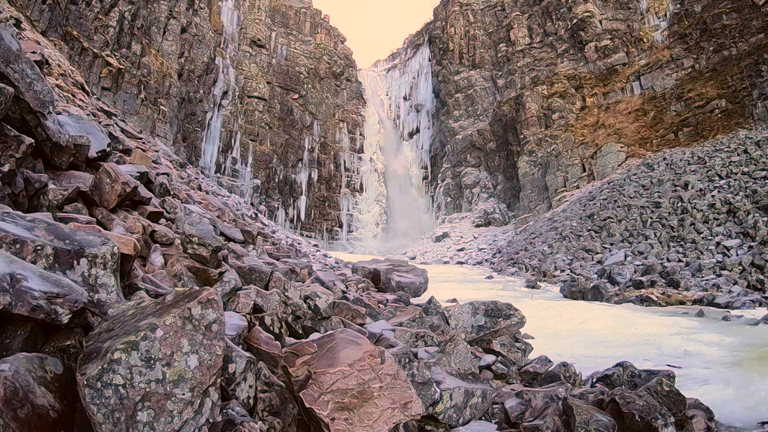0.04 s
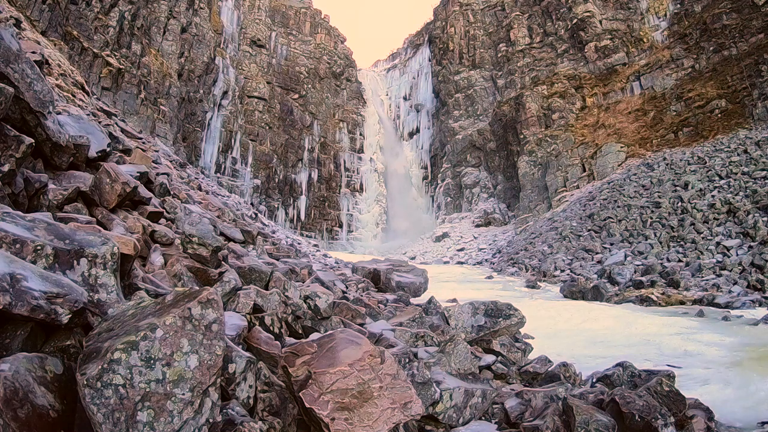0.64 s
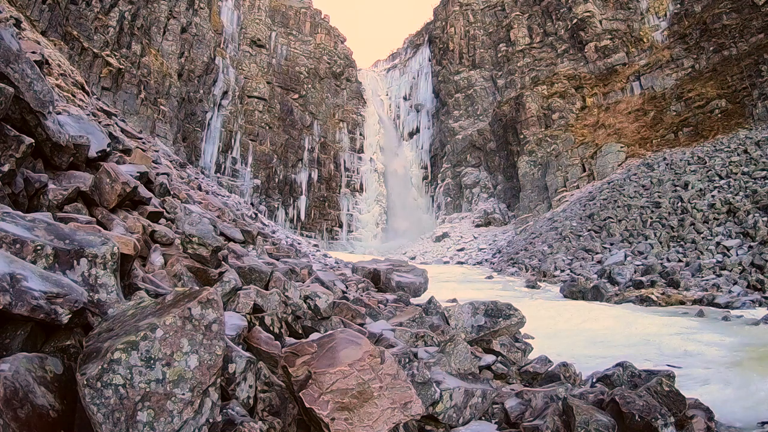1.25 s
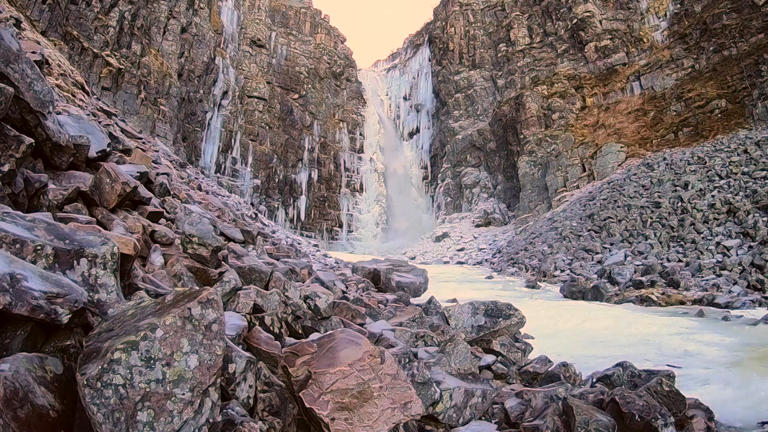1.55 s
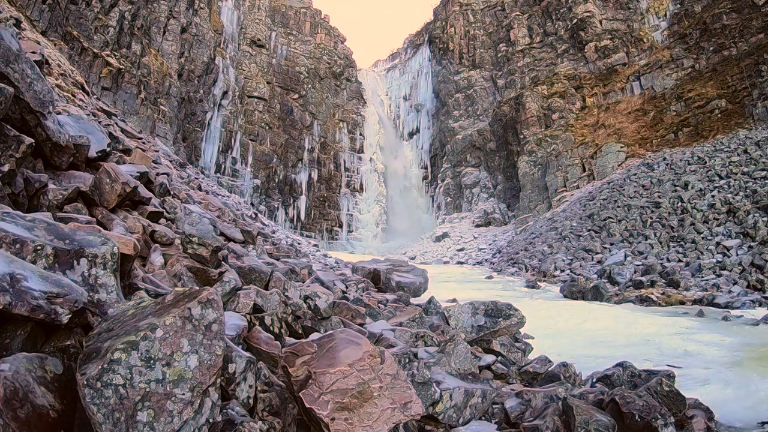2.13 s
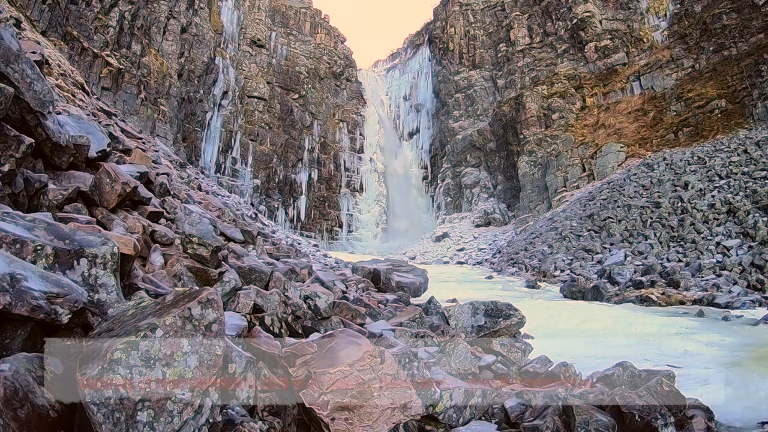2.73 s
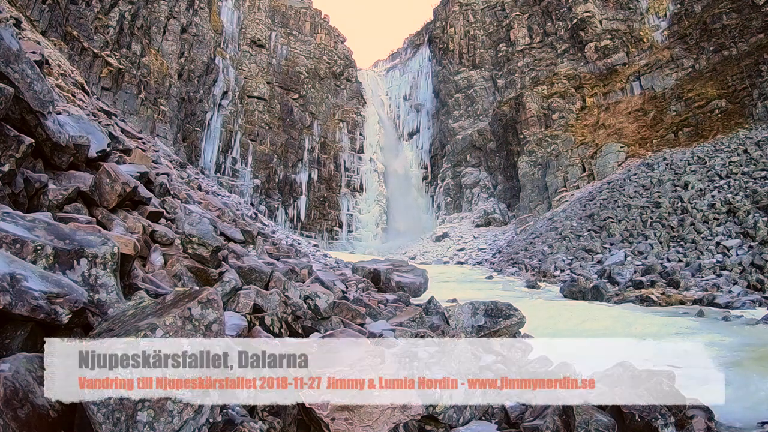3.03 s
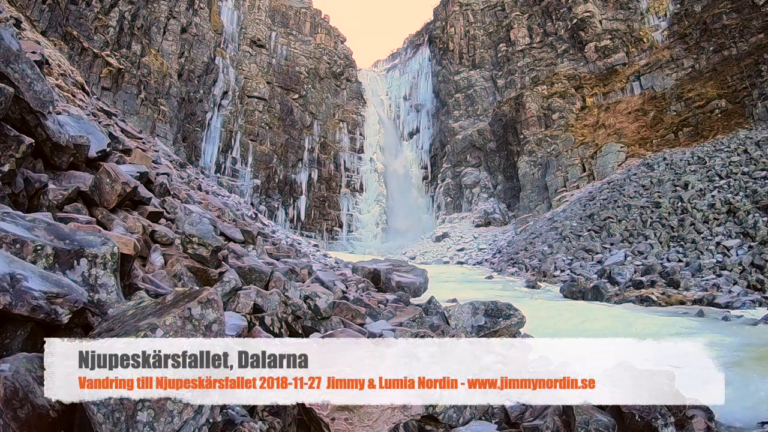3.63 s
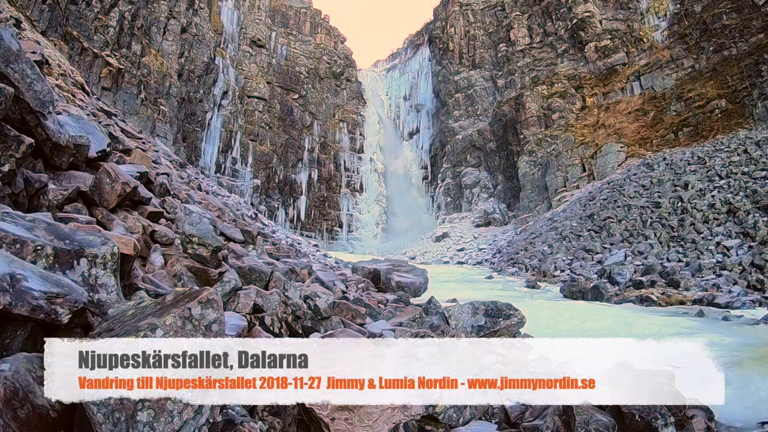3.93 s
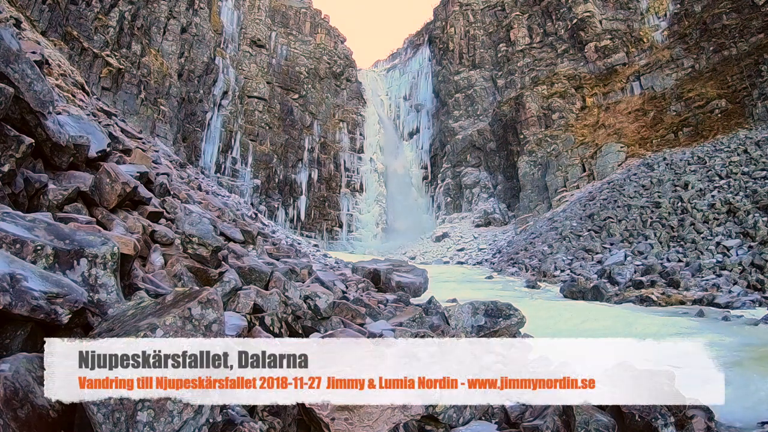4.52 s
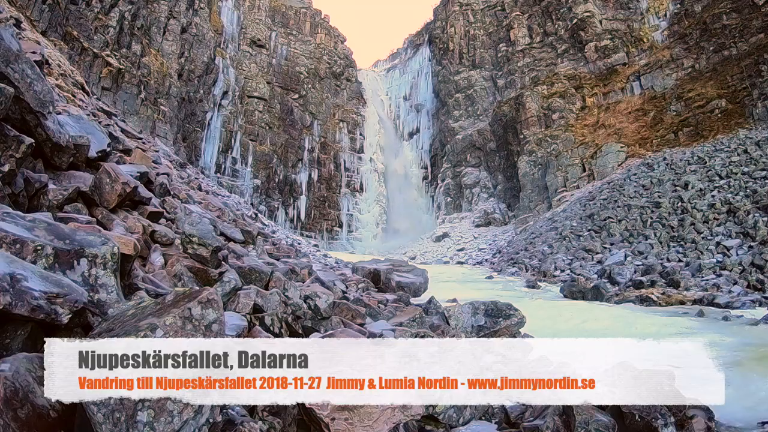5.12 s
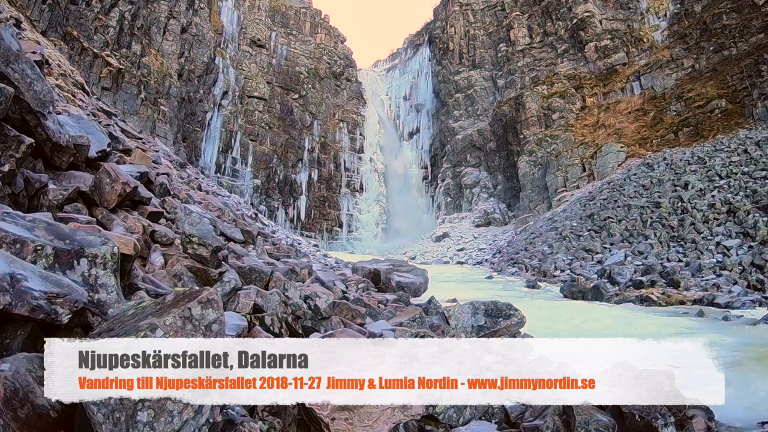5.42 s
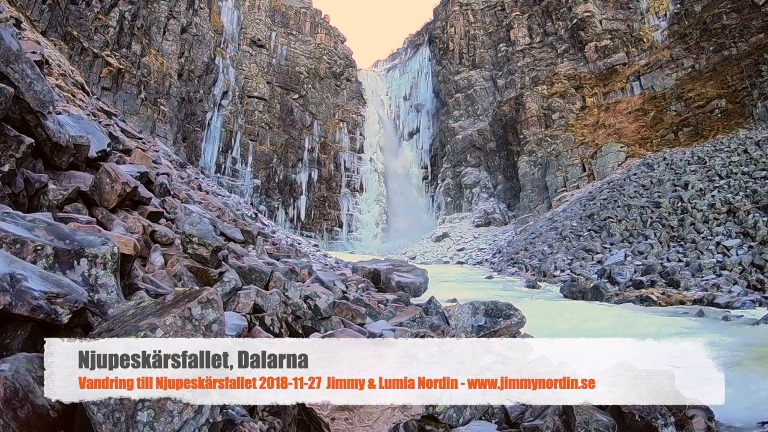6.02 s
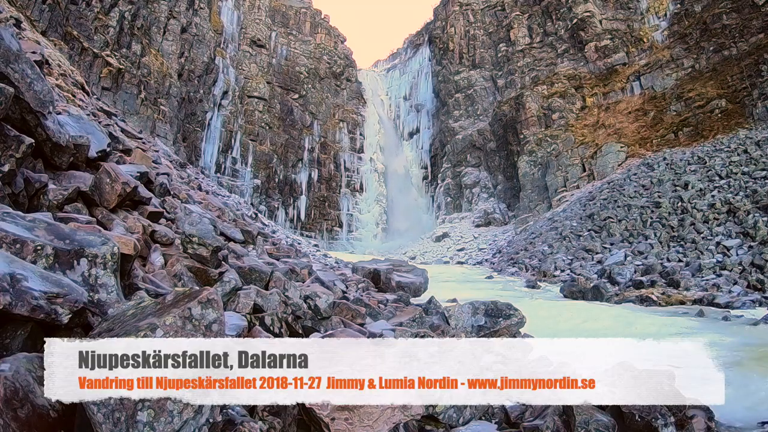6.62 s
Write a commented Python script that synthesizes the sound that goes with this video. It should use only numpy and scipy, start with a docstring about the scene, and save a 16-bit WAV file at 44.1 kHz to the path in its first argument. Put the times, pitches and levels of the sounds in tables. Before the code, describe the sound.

A tall waterfall rushes some way off in a rocky gorge, a broad, steady wash that starts at once and lasts the full seven seconds. Wind rumbles and thumps unevenly right on the microphone, mostly on the right side, with a faint low hum wavering beneath it. Small gusts come in the first half second, then stronger ones from about 0.9 to 1.3 seconds and 2.5 to 3 seconds. The wind eases between 3 and 4.7 seconds, when heavy sheets of water land in the pool with soft, dull thuds. Gusts return around 5 seconds and are strongest from 6 seconds to the end. The rush dips briefly after each hard gust and creeps back. A few faint, tiny drops of spray tick close by at about 0.5 to 0.8 seconds and again from 5.8 to 6.6 seconds.

```python
"""Waterfall in a rocky gorge

A tall fall rushes some way off, heard through two closely spaced microphone ports; heavy sheets
of water thud into its pool. Gusts rumble and thump right on the ports, a low hum wavers, and the
gain control ducks the rush after each hard gust. Now and then a drop of spray ticks close by."""
import sys
import numpy as np
from scipy import signal
from scipy.fft import rfft, irfft, next_fast_len
from scipy.io import wavfile
from scipy.ndimage import uniform_filter1d

SR = 44100
rng = np.random.default_rng(int(sys.argv[2]) if len(sys.argv) > 2 else 0)


def transcribe(u):
    """Save the signal u as a 16-bit wav file named by the first command-line argument.

    u: samples, shape (n,) or (channels, n), limited to [-1, 1]; the rate is SR.
    q: integer samples, one column per channel.
    """
    v = np.clip(np.atleast_2d(u).T, -1, 1)
    q = np.round(v * 32767).astype(np.int16)
    wavfile.write(sys.argv[1], SR, q)


N = 298056
TIME = np.arange(N) / SR
FFT_SIZE = next_fast_len(N, real=True)
FREQS = np.maximum(np.arange(FFT_SIZE // 2 + 1) * SR / FFT_SIZE, 1)


def from_db(db):
    """Decibels to gain."""
    return 10 ** (np.asarray(db) / 20)


def unit_rms(x):
    """Scale to an rms of 1."""
    return x / np.sqrt(np.mean(x ** 2) + 1e-20)


def in_time(rows):
    """The columns of a curve at every sample."""
    times, *columns = np.transpose(rows)
    return [np.interp(TIME, times, column) for column in columns]


def in_frequency(rows):
    """The columns of a spectrum at every frequency, joined on a log axis."""
    hz, *columns = np.transpose(rows)
    return [np.interp(np.log(FREQS), np.log(hz), column) for column in columns]


def white():
    """The spectrum of fresh white noise."""
    return rfft(rng.standard_normal(FFT_SIZE))


def waveform(spectrum):
    """From a spectrum back to N samples."""
    return irfft(spectrum, FFT_SIZE)[..., :N]


def drift(rate_hz):
    """A random wander of unit rms, mostly slower than rate_hz."""
    return unit_rms(waveform(white() / (1 + (FREQS / rate_hz) ** 2)))


def low_pass(corner_hz, order):
    """Gain of a smooth low-pass at every frequency."""
    return 1 / np.sqrt(1 + (FREQS / corner_hz) ** (2 * order))


def port_noise(gain, likeness):
    """Spectra of coloured noise at the two ports; likeness is the share of power in common."""
    common = np.sqrt(likeness) * white()
    separate = np.sqrt(1 - likeness) * np.array([white(), white()])
    return gain * (common + separate)


def steadied(x, span_s):
    """Noise whose strength is held at 1 over spans longer than span_s."""
    power = uniform_filter1d(x ** 2, int(span_s * SR), axis=-1)
    return x / np.sqrt(np.maximum(power, 0) + 1e-20)


def panned(left_right_db):
    """Left and right gains whose mean is 1."""
    ratio = np.atleast_1d(from_db(left_right_db))
    return 2 * np.array([ratio, np.ones_like(ratio)]) / (1 + ratio)


def churned(spectra, surge_db, flicker_db, flicker_hz):
    """Sheets of water land unevenly: all octaves surge together, and each flickers on its own."""
    octave = np.clip(np.log2(FREQS / 200), 0, 5)
    common_db = surge_db * drift(rate_hz=4.3)
    out = 0
    for k in range(6):
        band = waveform(spectra * np.maximum(1 - abs(octave - k), 0))
        out = out + band * from_db(common_db + flicker_db * drift(flicker_hz))
    return out


# Colour of the fall from across the gorge: (frequency [Hz], relative density [dB])
RUSH_SPECTRUM = [(200, -1.5), (320, -3), (480, -5), (780, -8), (1100, -7.5), (2400, -10), (3550, -10.5),
                 (5000, -18), (6200, -14.5), (7400, -24), (8800, -42.5), (10200, -74), (12400, -60),
                 (15000, -90)]
# The fall at the two ports: (frequency [Hz], left-right [dB], likeness [0-1], left phase lead [rad])
RUSH_AT_PORTS = [(130, -5.4, 0.65, -0.32), (300, -4.6, 0.94, 0.01), (520, -9.9, 0.76, 0.44),
                 (700, -6.4, 0.63, 1.13), (900, -3.4, 0.69, 1.83), (1300, -0.4, 0.55, 1.29),
                 (2400, -0.7, 0.63, 0.67), (3800, -1.8, 0.82, 0.33), (5000, -4.1, 0.4, -0.11),
                 (6300, -1.9, 0.16, -0.05), (7500, -2.8, 0.2, -2.9)]
# The rush swells and sinks a little: (time [s], level [dB])
RUSH_SWELL = [(0.1, -19.5), (0.5, -21.5), (0.8, -21), (1.15, -21), (1.5, -20.5), (2.3, -21.5),
              (2.66, -19.5), (3.1, -20), (4.0, -21), (5.5, -20), (5.8, -20.3), (6.0, -20), (6.15, -19.8),
              (6.45, -21), (6.75, -20.5)]
def waterfall():
    """Countless far splashes merge into a rush that reaches the left port slightly first."""
    side_db, likeness, lead = in_frequency(RUSH_AT_PORTS)
    colour_db, = in_frequency(RUSH_SPECTRUM)
    level_db, = in_time(RUSH_SWELL)
    ports = panned(side_db) * np.array([np.exp(1j * lead), np.ones_like(lead)])
    # the colour belongs to the sum of both ports, where out-of-phase parts partly cancel
    cross_power = 2 * likeness * ports.prod(axis=0).real
    summed_gain = np.sqrt(np.sum(abs(ports) ** 2, axis=0) + cross_power)
    bass_cut = np.sqrt(1 - low_pass(corner_hz=150.7, order=5) ** 2)
    spectra = port_noise(from_db(colour_db) * bass_cut, likeness) * ports / summed_gain
    rush = churned(spectra, surge_db=0.47, flicker_db=0.55, flicker_hz=39)
    return rush / np.std(rush.mean(axis=0)) * from_db(level_db)


# The breeze on the microphone between gusts: (time [s], relative level [dB])
BREEZE_LEVEL = [(0.15, -55), (0.28, -46), (0.77, -44.5), (1.05, -34), (1.35, -38), (1.77, -49.5),
                (2.28, -51), (2.56, -34), (2.92, -35), (3.35, -52), (4.6, -54), (4.89, -43.5), (5.6, -53),
                (5.96, -41.5), (6.45, -33.5), (6.75, -29)]
# Gusts, mostly on the right port: (start [s], length [s], level [dB], left-right [dB])
PORT_GUSTS = [(0.09, 0.13, -27, 0), (0.245, 0.04, -31, -6), (0.427, 0.082, -29, -3), (0.857, 0.041, -23, 4),
              (0.923, 0.05, -19, 1), (1.01, 0.075, -22, -7), (1.195, 0.093, -23, -2), (1.97, .09, -36, -10),
              (2.36, 0.02, -28, -7), (2.467, 0.04, -29.5, -13), (2.55, 0.068, -21, -6), (2.73, .04, -37, 2),
              (2.87, 0.04, -24, -7), (3.05, .05, -30, -1), (4.007, 0.048, -30, -4),
              (4.235, 0.043, -32.5, -1), (4.698, 0.038, -36.5, 7), (4.817, 0.049, -24, -12),
              (4.992, 0.12, -28.5, 2), (5.134, 0.065, -23, -8), (5.372, 0.028, -24, -6),
              (5.596, 0.043, -38, 1), (5.788, 0.1, -26, -9), (5.933, 0.041, -19, -4.5),
              (6.162, 0.051, -20, -15), (6.264, 0.067, -18, -14), (6.487, 0.05, -16.5, -13),
              (6.564, 0.037, -16, 0), (6.687, .08, -16, -2)]
def wind_strength(breeze_gain_db=11.5, lumps_db=3.2, attack_s=0.0075, release_s=0.041):
    """Strength of the wind at each port: a lumpy breeze, and gusts that rise, hold and die away."""
    breeze_db, = in_time(BREEZE_LEVEL)
    lumps = np.array([drift(rate_hz=14), drift(rate_hz=14)])
    breeze = from_db(breeze_db + breeze_gain_db + lumps_db * lumps) * panned(left_right_db=-4)
    power = breeze ** 2
    for start_s, length_s, level_db, side_db in PORT_GUSTS:
        rise = np.clip((TIME - start_s) / attack_s, 0, 1)
        fall = np.exp(-np.clip((TIME - start_s - length_s) / release_s, 0, 20))
        power = power + (from_db(level_db) * rise * fall * panned(side_db)) ** 2
    return np.sqrt(power)


# Wind right on the ports, ahead of its low-pass: (frequency [Hz], relative density [dB])
RUMBLE_SPECTRUM = [(8.8, -46), (15, -10), (38, -2), (59, 6.5), (156, -6), (200, 3.5), (260, -31),
                   (440, -120)]
def wind():
    """Eddies buffet each port in lumps; the lumps also flutter higher up."""
    colour_db, = in_frequency(RUMBLE_SPECTRUM)
    eddies = port_noise(from_db(colour_db) * low_pass(corner_hz=176, order=4), likeness=0.21)
    rumble = steadied(waveform(eddies), span_s=0.037)
    flutter_spectra = port_noise(low_pass(corner_hz=240, order=3), likeness=0.31)
    flutter = unit_rms(waveform(flutter_spectra)) * abs(rumble)
    return (rumble + from_db(-14.5) * flutter) * wind_strength()


# The low hum at the microphone: (time [s], relative level [dB])
HUM_LEVEL = [(0.15, -32.5), (0.37, -27.5), (0.87, -47), (0.9, -32), (0.98, -43), (1.27, -21.5), (1.31, -30),
             (1.64, -42), (1.8, -27), (2.06, -33.5), (2.63, -32), (2.67, -44), (3.09, -29.5), (3.15, -52),
             (3.27, -30), (3.37, -41), (3.92, -34), (4.78, -39), (4.91, -29), (5.08, -53), (5.15, -31),
             (5.21, -45), (5.42, -36.5), (6.75, -34)]
def hum(centre_hz, half_width_hz, side_db, gain_db):
    """A low resonance, stirred by noise, that wavers in pitch and strength."""
    level_db, = in_time(HUM_LEVEL)
    resonance = 1 / (1 + ((FREQS - centre_hz) / half_width_hz) ** 2)
    tone = steadied(waveform(port_noise(resonance, likeness=0.63)), span_s=0.079)
    return tone * from_db(level_db + gain_db) * panned(side_db)


# Eddies striking the microphone: (time [s], peak [dB], pitch [Hz], half length [s], left-right [dB])
EDDY_THUMPS = [(0.291, -14, 76.4, 0.012, -7), (0.43, -9, 110, 0.0038, -15), (0.482, -15, 62, 0.013, -19),
               (0.921, -21, 150, 0.0043, -10), (0.935, -10, 80, 0.0048, -19), (0.975, -8, 71, 0.0098, -13),
               (1.028, -12, 85, 0.0076, -16), (1.075, -16, 80, .008, -14), (1.119, -9, 101, 0.0035, -21),
               (1.246, -13.5, 160, 0.013, -7.5), (2.48, -21, 151, 0.025, -2), (2.495, -17, 92, 0.012, -16),
               (2.565, -14, 110, 0.0066, -8), (2.583, -6.5, 74.6, 0.01, -19),
               (2.618, -2, 100, 0.0039, -17.5), (2.9, -13, 100, 0.0074, -8), (3.255, -18.5, 168, .014, -6),
               (4.504, -16, 195, 0.011, -6), (5.143, -9.5, 115, 0.0047, -33), (5.174, -7, 84, 0.005, -25),
               (5.966, -13, 80, 0.0039, 4), (6.151, -13.5, 82.5, 0.012, -9), (6.203, -2, 62.4, 0.008, -19),
               (6.405, -13, 70, 0.0077, -12), (6.505, -11, 120, 0.0064, -14), (6.59, -10.5, 65, 0.012, -6),
               (6.614, -11.5, 45, 0.01, -12), (6.724, -9, 154, 0.0053, -22)]
def thumps():
    """A single eddy swings the pressure at a port for a cycle or a few."""
    out = 0
    for time_s, peak_db, hz, half_s, side_db in EDDY_THUMPS:
        offset_s = TIME - time_s
        swell = from_db(peak_db) * np.exp(-np.minimum((offset_s / half_s) ** 2, 20))
        out = out + swell * np.cos(2 * np.pi * hz * offset_s) * panned(side_db)
    return out


# Spray landing close to the microphone:
# (time [s], relative level [dB], ring [Hz], time to fall 60 dB [s], splash gain against the ring [dB])
SPRAY_DROPS = [(0.485, -17, 7700, .009, 2), (0.561, -13, 7700, .009, 3), (0.759, -6.5, 6030, .009, -12),
               (5.822, -14, 6500, .009, -3), (6.045, -14, 6200, .008, -3), (6.174, -18, 6500, .006, 6),
               (6.186, -16, 6700, .008, 2), (6.402, -14, 5770, .007, 12), (6.614, -11, 5560, .012, 13)]
def drops(side_db, rise_s, crisp_db):
    """Each drop lands with a tiny splash and rings for a few milliseconds."""
    ticks, age = np.zeros(N), TIME[:SR // 20]
    splash_band = signal.butter(1, [500, 2400], "band", fs=SR, output="sos")
    splashes = signal.sosfilt(splash_band, rng.standard_normal((len(SPRAY_DROPS), len(age))))
    attack = 1 - np.exp(-(age / rise_s) ** 2)
    for (time_s, level_db, hz, t60_s, splash_db), splash in zip(SPRAY_DROPS, splashes):
        ring = np.sin(2 * np.pi * hz * age)
        envelope = attack * from_db(level_db - 60 * age / t60_s)
        tick = (ring + from_db(splash_db) * splash) * envelope
        start = round(time_s * SR)
        ticks[start:start + len(age)] += tick[:N - start]
    # the ports pass only a faint, crisp trace of the top octave
    dull = signal.sosfilt(signal.butter(8, 7700, fs=SR, output="sos"), ticks + 1e-18)
    return (dull + from_db(crisp_db) * ticks) * panned(side_db)


# Heavy sheets of water thud into the pool under the far fall: (time [s], level [dB])
POOL_PLUNGES = [(0.891, -27.5), (1.573, -24), (3.244, -23.5), (3.492, -26), (3.711, -21), (3.77, -22.5),
                (3.876, -23.5), (4.47, -25.5), (4.93, -24.5), (5.89, -25), (5.96, -35)]
def plunges(centre_hz, half_width_hz, side_db, rise_s=0.0049, fall_s=0.03):
    """Each heavy sheet of water swells the low roar of the pool for a moment."""
    pool_band = 1 / (1 + ((FREQS - centre_hz) / half_width_hz) ** 4)
    roar = steadied(waveform(port_noise(pool_band, likeness=0.92)), span_s=0.015)
    strength = 0
    for time_s, level_db in POOL_PLUNGES:
        spread_s = np.where(TIME < time_s, rise_s, fall_s)
        swell = np.exp(-np.minimum(((TIME - time_s) / spread_s) ** 2, 20))
        strength = strength + from_db(level_db) * swell
    return roar * strength * panned(side_db)


def gain_control(x, threshold_db=-17, squeeze=0.62, detect_s=0.015, duck_s=0.005, recover_s=0.36):
    """A hard gust on either port turns both down quickly; the gain then creeps back."""
    power = uniform_filter1d(x ** 2, int(detect_s * SR), axis=-1).max(axis=0)
    level_db = 10 * np.log10(np.maximum(power, 1e-12))
    cut_db = squeeze * np.maximum(level_db - threshold_db, 0)
    recovery = np.exp(-TIME / recover_s)
    held_db = np.maximum.accumulate(cut_db / recovery) * recovery   # a cut fades until a deeper one comes
    lag = np.exp(-1 / (duck_s * SR))
    smoothed_db = signal.lfilter([1 - lag], [1, -lag], held_db)
    return x * from_db(-smoothed_db)


def scene():
    """The far fall and its pool, with wind, hum and spray at the microphone."""
    water = waterfall() + plunges(centre_hz=350, half_width_hz=126, side_db=-5.5)
    air = wind() + thumps() + hum(centre_hz=158.4, half_width_hz=6.4, side_db=-6, gain_db=2.5)
    spray = drops(side_db=-10, rise_s=0.0003, crisp_db=-29)
    return water + air + spray


def record(dry):
    """The microphone signal fades in quickly and passes the gain control; the top is cut steeply."""
    start_s, fade_s, cutoff_hz = 0.077, 0.018, 15800
    fade_in = np.clip((TIME - start_s) / fade_s, 0, 1)
    top_cut = signal.butter(16, cutoff_hz, fs=SR, output="sos")
    return signal.sosfilt(top_cut, gain_control(dry * fade_in))


dry = scene()
out = record(dry)
transcribe(out)
```